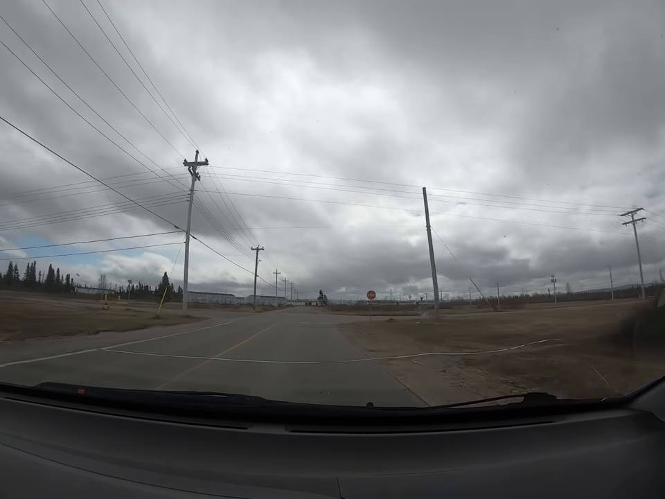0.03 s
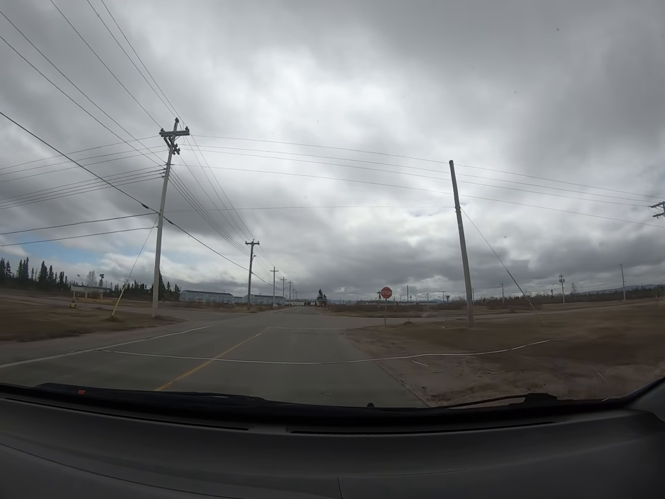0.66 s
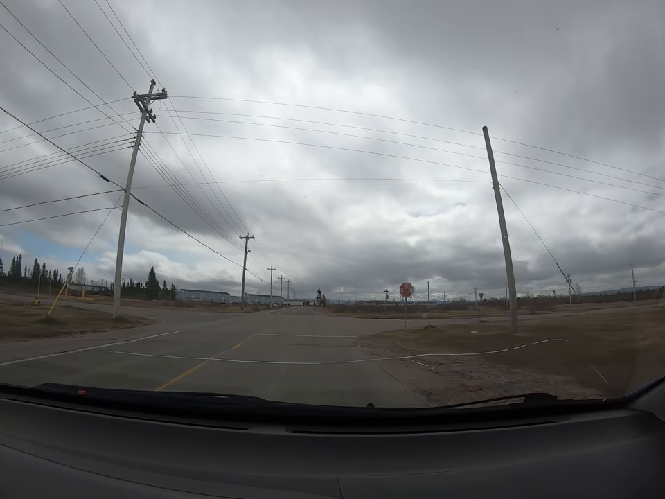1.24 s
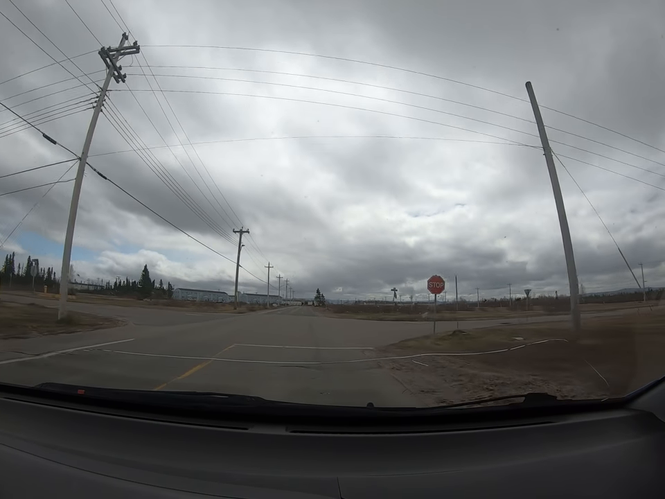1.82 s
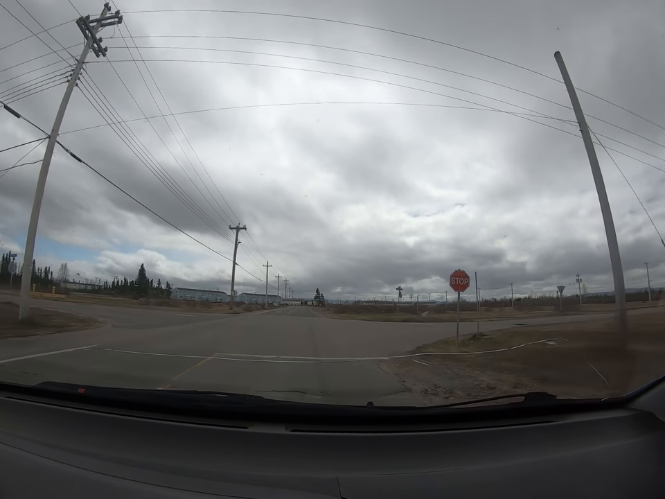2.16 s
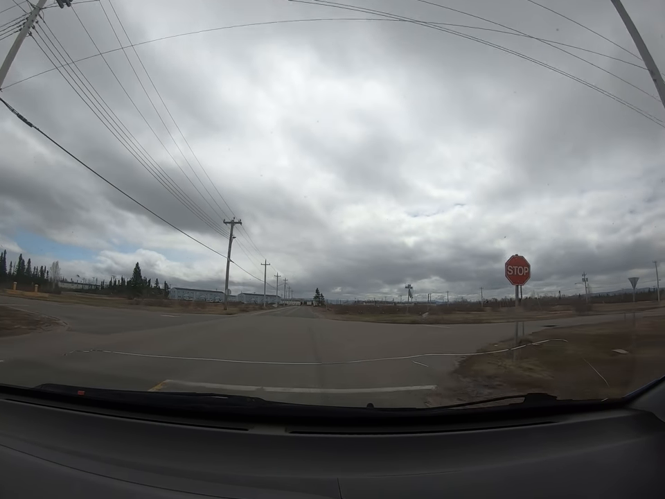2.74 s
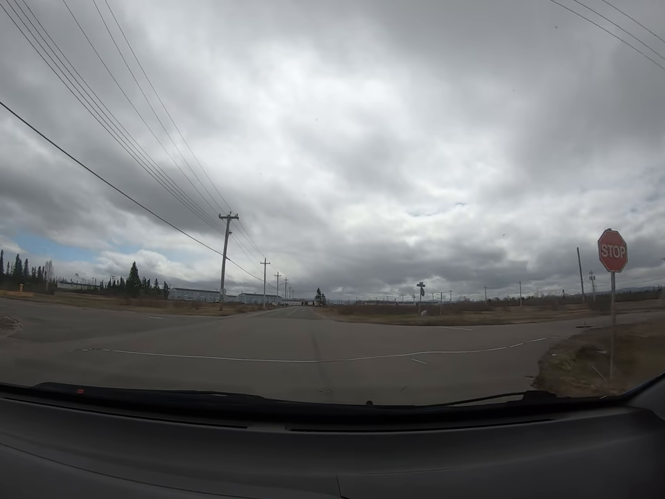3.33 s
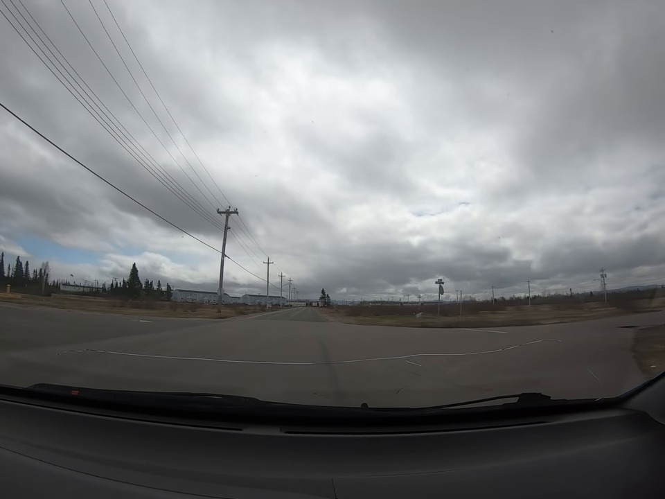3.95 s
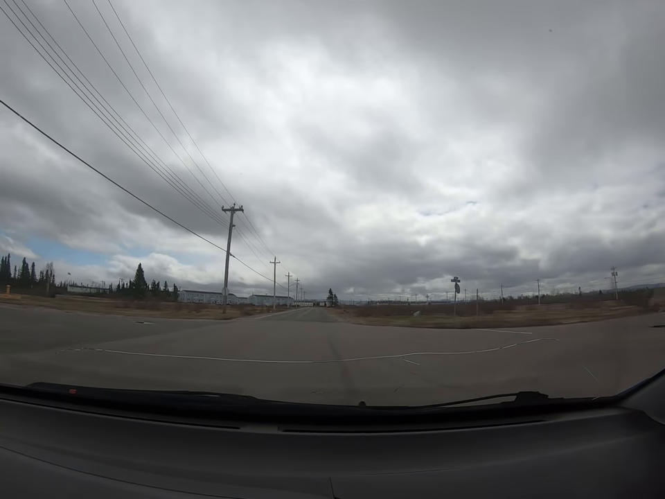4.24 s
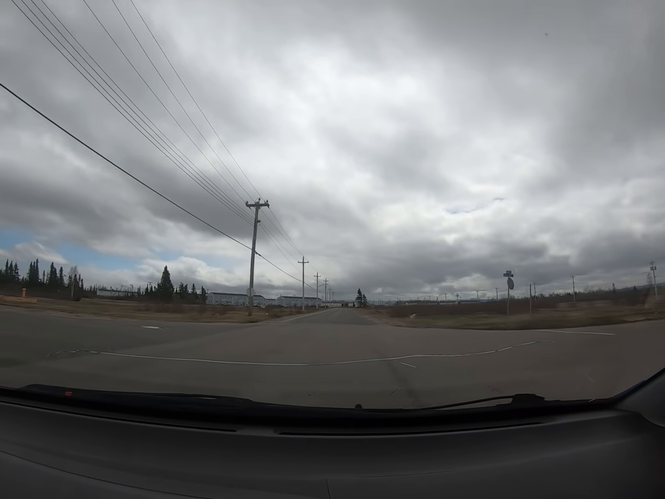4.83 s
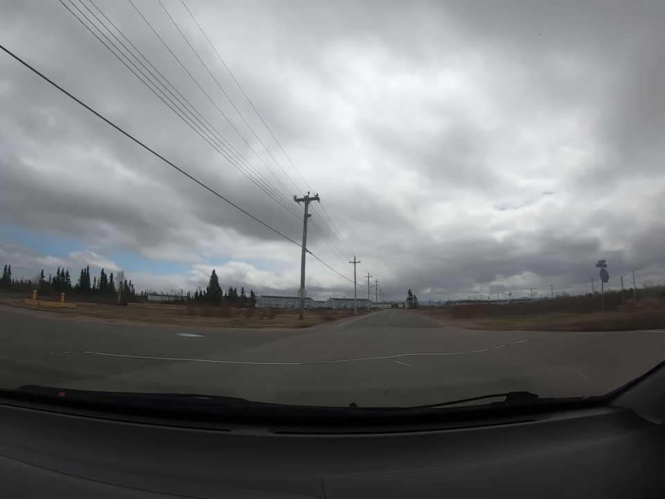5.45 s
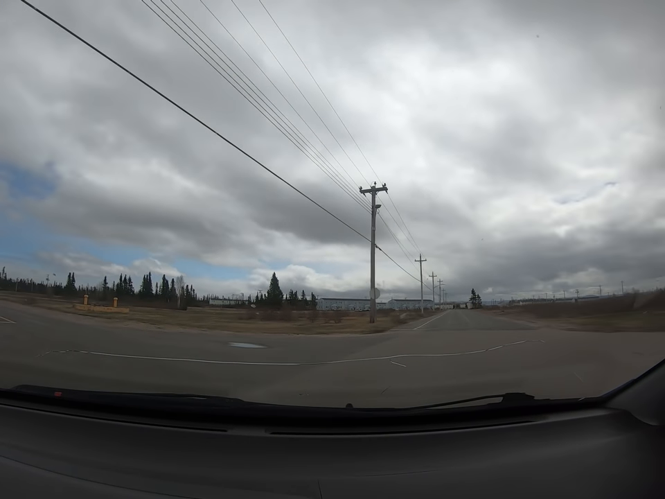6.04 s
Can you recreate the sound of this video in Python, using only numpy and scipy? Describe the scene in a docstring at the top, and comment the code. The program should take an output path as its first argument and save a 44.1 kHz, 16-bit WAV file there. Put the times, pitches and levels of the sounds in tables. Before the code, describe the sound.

A turn signal clicks evenly, close to a stereo microphone on the dashboard, over the deep rumble of a car's engine and tyres. The engine note sinks as the car nears a junction, and a cluster of dull jolts booms through the cabin. Loose sand hisses faintly below the floor, with scattered stone ticks and a couple of sharper cracks. Near the end the engine picks up speed with a light whirr.

```python
"""Car at a junction, from inside

Stereo microphone at the dashboard. The car slows, jolts over seams, crosses loose grit and pulls away.
The engine drones and whirrs under the road rumble, and the rolling tyres hum. Below the floor, grit
hisses in the wheel arches and stones strike the underside. Close by, the indicator relay goes tick-tock."""
import sys
import numpy as np
from scipy import signal
from scipy.fft import rfft, irfft, next_fast_len
from scipy.io import wavfile
from scipy.ndimage import map_coordinates

SR = 44100
rng = np.random.default_rng(int(sys.argv[2]) if len(sys.argv) > 2 else 0)


def file_out(sig):
    """Save sig as 16-bit WAV at sys.argv[1]."""
    # one column per channel
    cols = np.atleast_2d(sig).T
    # limit, then scale
    lim = np.clip(cols, -1, 1)
    pcm = np.round(lim * 32767).astype(np.int16)
    wavfile.write(sys.argv[1], SR, pcm)


N = 268128

# Cabin resonances. Each row: centre in Hz, width in Hz, lift in dB.
CABIN_RESONANCES = [(81.4, 31, 4), (189, 26, 3), (243, 10, 3), (358.5, 19, 3), (883, 73, 9), (982, 30, 6.5),
                    (1282, 62, 6.5), (1525, 32, 5), (2916, 70, 6.5), (3360, 70, 6), (3620, 130, 3.5),
                    (5330, 120, -1)]
# How alike the cabin noise is left and right. Each row: frequency in Hz, likeness from 0 to 1.
STEREO_LIKENESS = [(30, 0.93), (80, 0.96), (150, 0.87), (280, 1), (550, 0.85), (1000, 0.076), (2500, 0.49),
                   (8000, .05)]
# Noise colours at the microphone. Each row: frequency in Hz, relative spectral level in dB.
RUMBLE_SPECTRUM = [(14, -37.5), (22, -13.5), (30, 1.5), (47, 2.5), (61, -11), (88, -7.5), (130, -12.5),
                   (170, -24.5), (220, -39), (370, -120)]  # suspension
BODY_SPECTRUM = [(94, -23.5), (160, -3), (231, -10), (295, -13), (366, -15.5), (481, -21.5), (560, -28),
                 (730, -63), (1230, -120)]  # body panels
ROAR_SPECTRUM = [(290, -32), (500, -11.5), (538, -0.5), (629, -5), (773, -1.5), (926, -14), (996, -5.5),
                 (1080, -10), (1320, -11), (1800, -15.5), (3180, -25), (3420, -27), (4570, -44.5),
                 (5220, -37.5), (9000, -58), (11700, -82.5), (19800, -120)]  # tread on asphalt
WHIRR_SPECTRUM = [(900, -35), (1150, -6), (1300, 6.5), (1500, -4.5), (2400, -4.5), (3050, -7.5),
                  (3450, -7.5), (4200, -14.5), (5400, -12), (7000, -23.5), (10000, -30), (13000, -56)]  # belts and valve gear
GRIT_SPECTRUM = [(880, -36.5), (1500, -2.5), (1970, -1.5), (2540, -5.5), (3400, -7.5), (5000, -10),
                 (6450, -11), (9830, -15.5), (10800, -21.5), (14000, -51), (22000, -120)]  # gritty hiss
STONE_SPECTRUM = [(300, -38.5), (800, -25.5), (1150, -12), (1400, -8.5), (2000, -5.5), (2600, -6),
                  (3450, -8), (4400, -2.5), (5200, -5), (6250, -3), (7800, -7), (10300, -10.5),
                  (11200, -30.5), (15000, -35.5)]  # a stone's crack
TOCK_SPECTRUM = [(350, -26), (520, 0.5), (720, 0), (850, -2), (1400, 3), (1850, 9), (2500, -1.5),
                 (3400, -1), (4400, -3.5), (7700, -5), (10300, -7.5), (11300, -19), (14000, -24.5),
                 (16000, -36)]  # relay contacts closing
TICK_SPECTRUM = [(400, -33), (900, 7), (1900, -3), (2600, 4), (3300, 3.5), (4000, 1), (4550, -1),
                 (5400, 1.5), (6300, -8), (7500, -1.5), (10300, -1.5), (11300, -16.5), (14500, -19.5),
                 (16000, -32.5)]  # relay contacts opening
# Levels along the drive. Each row: time in seconds, level in dB.
SUSPENSION_LEVEL = [(0, -22), (.45, -29), (1.3, -25.5), (2.05, -22.5), (2.25, -26.5), (2.72, -23),
                    (2.8, -31), (2.88, -22), (3.15, -21), (3.3, -26), (3.5, -24), (3.85, -24), (4.2, -30.5),
                    (4.6, -28.5), (5.5, -23.5), (6.08, -26)]  # set by how uneven the road is
SURFACE_DRIVE = [(0.0, -45), (0.49, -46), (0.77, -45), (1.25, -46.5), (2.63, -49), (2.98, -47.5),
                 (3.18, -51), (3.49, -51), (3.82, -50), (4.97, -48.5), (5.09, -47), (5.69, -45.5),
                 (5.95, -45), (6.05, -45.5)]  # how hard the surface drives the tyres, taken relative to its mean
ENGINE_LEVEL = [(0, -21), (2.6, -20.5), (2.85, -32), (3.35, -29), (3.48, -17.5), (3.62, -23), (3.77, -15.5),
                (3.97, -26.5), (4.25, -31), (4.6, -25.5), (4.8, -17.5), (4.97, -23), (5.21, -24.5),
                (5.8, -23.5), (6.08, -30.5)]  # steady on the approach, uneven across the junction
SAND_FILM_LEVEL = [(2.6, -86.5), (3.05, -73.5), (3.45, -73.5), (3.9, -67), (4.55, -65.5), (5.3, -69.5),
                   (6.08, -85)]  # thin sand over the whole junction
SOFTENING = [(0, 0), (1.3, -1), (2.2, -1.5), (2.85, -0.5), (3.4, -4), (4.1, -1.5), (4.8, .5)]  # the clicks and the whirr soften for a moment
# Tyre hum. Each row: time in seconds, pitch in Hz, level in dB.
TYRE_HUM = [(0, 148.2, -31.5), (.35, 146.3, -34), (.7, 137.3, -33.5), (1.1, 140.5, -44),
            (1.5, 148.1, -35.5), (1.8, 145.8, -45), (2.1, 146.4, -33.5), (2.6, 139.9, -35.5),
            (2.82, 140, -43), (3.4, 139.8, -53.5), (3.7, 143, -36.5), (4.02, 146.2, -46),
            (4.15, 147.9, -35.5), (4.4, 148.1, -34.5), (4.6, 149.1, -35), (4.78, 147, -27.5),
            (5.04, 151.1, -41), (5.26, 151.7, -31.5), (5.42, 146.8, -40), (5.54, 146, -33.5),
            (5.85, 145.3, -46.5), (6.05, 149, -32.5)]
# Engine speed. Each row: time in seconds, firing rate in Hz.
FIRING_RATE = [(0, 35.78), (.7, 35.34), (1.3, 33.94), (2.02, 31), (3.5, 27.45), (4.45, 27.49), (4.85, 33.8),
               (5.21, 43.57), (5.72, 50.4), (6.08, 58.58)]
# Wheels over seams. Each row: start in seconds, level in dB, boom in Hz, length and attack in seconds.
SEAM_JOLTS = [(2.826, -21, 83.3, 0.13, .015), (2.859, -15.5, 42.6, 0.077, .012),
              (2.986, -21, 40, 0.053, .012), (3.041, -13.5, 89, 0.032, .008),
              (3.061, -11.5, 44.85, .2, .006), (3.099, -25, 91.3, 0.12, .015),
              (3.664, -21, 43.66, 0.16, .017), (4.365, -16.5, 47.3, .11, .017)]
# Patches of gritty hiss; the last is a brief, thin, high hiss.
# Each row: start and length in seconds, level in dB, brightness in dB per octave.
HISS_PATCHES = [(2.878, 0.29, -62, -2.5), (3.577, 0.16, -59.5, -1.5), (4.01, 0.42, -64, 0.5),
                (4.676, 0.13, -58, -2.5), (4.907, 0.16, -62.5, 5.5)]
# Stones on the underside. Each row: start in seconds, level in dB, left over right in dB,
# brightness in dB per octave, place from floor pan (0) to wheel arch (1).
STONE_HITS = [(0.171, -50, 3, -12.5, 0.37), (0.734, -55.5, -3, -4.5, 0.36), (2.327, -56.5, -1, -2, 0.49),
              (2.684, -59, -4, -3, 0.48), (3.039, -55, -1, -0.5, 0.48), (3.0487, -46, 0, -7, 0.61),
              (3.293, -44, -5, -11, 0.53), (3.674, -47, -5, -14, 0.47), (3.735, -50, -4, -10, .5),
              (3.9737, -25.5, -3.5, -0.5, 0), (4.023, -51, -3, -10, 0.56), (4.166, -46, -5, -9.5, .5),
              (4.347, -56, -1, 3.5, 0.69), (4.554, -47.5, -6, -11, .5), (4.695, -58.5, 0, -4.5, 0.54),
              (4.991, -58, -2, 4, 0.72), (5.133, -42.5, 4, -2.5, 0.75), (5.1403, -32, -4, -3.5, 0.93),
              (5.292, -46.5, -4, -8.5, 0.49), (5.995, -46.5, 5, -10.5, .5)]
# Ringing parts. Each row: frequency in Hz, level in dB, seconds to fall 60 dB, left over right in dB.
FLOOR_PAN_MODES = [(1520, -14, .05, -2), (2700, -15, .035, -2), (3074, -9.5, .04, -1), (3451, -5, .04, 1),
                   (3890, -12, .045, 0), (4220, -11, .03, -2), (4549, -12.5, .05, -2), (4899, -14, .036, 3),
                   (5800, -11, .025, 0), (6390, -9, .032, 1), (6830, -14, .03, 0), (7400, -13, .032, 5),
                   (8000, -13, .025, 3)]
WHEEL_ARCH_MODES = [(1280, -16, .05, 0), (1500, -11, .04, -2), (2256, -15, .04, 0), (3000, -13, .03, -2),
                    (4000, -9, .028, 0), (4950, -10, .035, 2), (5970, -5.5, .04, 0), (6680, -7, .035, 0),
                    (8100, -9, .04, 2), (9850, -10, .035, 3)]
TOCK_MODES = [(470, -28.5, .042, -2.5), (614, -33.5, .055, -4.5), (715, -37.5, .06, -9),
              (977, -42.5, .05, 1), (1162, -47.5, .06, -8), (1400, -48, .06, 1), (1570, -48.5, .05, -3),
              (1700, -41, .038, -5), (1837, -36.5, .05, -1), (2130, -47.5, .06, .5), (2345, -51, .07, -2),
              (3000, -48, .06, -4), (3075, -51, .06, -8), (3620, -51, .07, -2), (3810, -56, .06, -6),
              (5470, -54, .05, -1.5), (7180, -53, .055, -3.5), (7600, -55, .055, -1), (9300, -53, .05, 3)]  # relay closing
TICK_MODES = [(460, -36.5, .04, -3.5), (715, -46.5, .06, -5.5), (1830, -58, .07, -.5),
              (2314, -54.5, .08, -.5), (2740, -54, .07, -5), (3058, -41.5, .036, -6), (3300, -51, .035, -4),
              (3445, -54, .06, -1.5), (3680, -52, .04, -4), (3950, -53.5, .04, -8), (5259, -54.5, .044, -7),
              (7526, -55, .04, -4), (9324, -58, .04, 12)]  # relay opening
# Where the relay's snap sits in the stereo picture. Each row: frequency in Hz, left over right in dB.
SNAP_BALANCE = [(1000, -7.5), (5500, 0.5), (7500, -2.5), (9500, 3.5)]


def amp(db):
    """Decibels to gain."""
    return 10 ** (np.asarray(db) / 20)


def unit(x):
    """Scale to rms 1."""
    return x / np.sqrt(np.mean(x ** 2) + 1e-20)


def along(points, hz):
    """Read (Hz, value) points on a log frequency axis."""
    freqs, values = np.transpose(points)
    return np.interp(np.log(hz + 1), np.log(freqs + 1), values)


def curves(rows):
    """One value per sample for each column after the time."""
    times, *columns = np.transpose(rows)
    return [np.interp(np.arange(N) / SR, times, column) for column in columns]


def wobble(rate):
    """A smooth random curve, rate knots a second."""
    return map_coordinates(rng.standard_normal(int(N * rate / SR) + 4), [np.arange(N) * rate / SR])


def filtered(x, response):
    """Filter x by a gain given as a function of Hz."""
    n = x.shape[-1]
    padded = next_fast_len(n + 8192)
    return irfft(rfft(x, padded) * response(np.fft.rfftfreq(padded, 1 / SR)), padded)[..., :n]


def tilted(rows, db_per_octave):
    """Brighten or dull a spectrum or a set of modes about 3 kHz."""
    return [(hz, db + db_per_octave * np.log2(hz / 3000), *rest) for hz, db, *rest in rows]


def resonance(hz, centre, width):
    """A bell-shaped peak of height 1."""
    return 1 / (1 + (2 * (hz - centre) / width) ** 2)


def pan(db):
    """Left and right gains; positive dB leans left."""
    return amp([[db / 2], [-db / 2]])


def add(track, start, sound):
    """Mix a sound into the track at start seconds."""
    part = track[:, max(round(start * SR), 0):]
    part[:, :sound.shape[-1]] += sound[..., :part.shape[-1]]


def cabin_noise(spectrum):
    """Stereo noise of rms 1, coloured by the cabin's resonances, near mono in the bass."""
    def colour(hz):
        lift_db = sum(db * resonance(hz, centre, width) for centre, width, db in CABIN_RESONANCES)
        spread = np.arccos(np.clip(along(STEREO_LIKENESS, hz), 0, 1)) / 2
        return amp(along(spectrum, hz) + lift_db) * [np.cos(spread), np.sin(spread)]
    mid, side = filtered(rng.standard_normal((2, N)), colour)
    return unit(np.array([mid + side, mid - side]))


def burst(spectrum, t60, attack, tilt_db=0):
    """A click scattered by the cabin's close walls into a short dense tail."""
    t = np.arange(SR // 10) / SR
    octaves = lambda hz: np.log2(np.maximum(hz, 1200) / 3000)
    colour = lambda hz: amp(along(spectrum, hz) + tilt_db * octaves(hz))
    noise = unit(filtered(rng.standard_normal((2, len(t))), colour))
    return noise * amp(-60 * t / t60) * (1 - np.exp(-t / attack))


def ring(modes, attack):
    """Damped modes of alternating sign, each reaching left and right at its own strength and phase."""
    t = np.arange(SR // 10) / SR
    tones = 0
    for i, (hz, db, t60, side_db) in enumerate(modes):
        phase = np.pi * i + rng.normal(0, 0.14) * np.array([[1], [-1]])
        tones += pan(side_db) * amp(db - 60 * t / t60) * np.sin(2 * np.pi * hz * t + phase)
    return tones * (1 - np.exp(-t / attack))


def cabin_drone():
    """Far back in the mix, a faint, fuzzy note that holds its pitch whatever the road does."""
    note = filtered(rng.standard_normal(N), lambda hz: resonance(hz, centre=357, width=24))
    return amp(-58.5) * unit(note)


def whirr():
    """Belts and valve gear whirr through the bulkhead, louder as the engine speeds up."""
    hz, = curves(FIRING_RATE)
    speed_db = 7.5 * np.log2(hz / hz[0])
    return amp(-63.5 + speed_db) * cabin_noise(WHIRR_SPECTRUM)


def road():
    """Unevenness shakes the suspension; the surface's grain drives the panels and makes the tread roar."""
    shake_db, = curves(SUSPENSION_LEVEL)
    drive_db, = curves(SURFACE_DRIVE)
    drive_db -= drive_db.mean()
    flutter_db = .5 * wobble(12)
    rumble = amp(shake_db + 1.2 * wobble(9)) * cabin_noise(RUMBLE_SPECTRUM)
    body = amp(-40.5 + 1.2 * drive_db + flutter_db) * cabin_noise(BODY_SPECTRUM)
    roar = amp(-55 + 0.78 * drive_db + flutter_db) * cabin_noise(ROAR_SPECTRUM)
    return rumble + pan(-0.21) * body + pan(0.32) * roar


def tyre_hum():
    """A wavering tone from the rolling tyres, roughened by uneven tread, a little right of centre."""
    hz, db = curves(TYRE_HUM)
    phase = 2 * np.pi * np.cumsum(hz) / SR + .4 * wobble(11)
    waver_db = wobble(9)
    left_lead = 0.26 * np.array([[1], [-1]])
    tread = unit(np.abs(1 + .45 * (wobble(30) + 1j * wobble(30))))
    return np.sqrt(2) * pan(-2.5) * amp(db + waver_db) * tread * np.sin(phase + left_lead)


def engine():
    """The firing order booms in the cabin; its overtones grow as the engine speeds up."""
    hz, = curves(FIRING_RATE)
    db, = curves(ENGINE_LEVEL)
    phase = 2 * np.pi * np.cumsum(hz) / SR + 0.18 * wobble(14)
    load_db = 16 * np.log2(hz / hz[0])
    second = amp(-18.5 + load_db + 0.58 * wobble(29)) * np.sin(2 * phase)
    third = amp(-33.5 + load_db + 5.3 * wobble(2.7)) * np.sin(3 * phase + np.pi)
    return np.sqrt(2) * amp(db + 1.9 * wobble(8.9)) * (np.sin(phase) + second + third)


def jolts(damping_db_per_s=10.5):
    """Each seam sets the car's body booming for a few cycles and shakes the panels."""
    out, panels = np.zeros((2, N)), cabin_noise(BODY_SPECTRUM)
    for start, db, hz, length, attack in SEAM_JOLTS:
        t = np.arange(int(length * SR)) / SR
        swell = np.tanh(t / attack) * np.tanh(2 * np.pi * (1 - t / length)) * amp(-damping_db_per_s * t)
        shake = amp(-23.5) * panels[:, round(start * SR):][:, :len(t)] * np.exp(-t / 0.087)
        add(out, start, amp(db) * swell * (np.sin(2 * np.pi * hz * t) + shake))
    return out


def grit(attack_s=0.2, release_s=0.081, grains_per_s=130, grain_fade_s=.005):
    """A film of sand sprays the wheel arches in tiny impacts; patches of hiss build and fade over it."""
    t = np.arange(N) / SR
    film_db, = curves(SAND_FILM_LEVEL)
    hiss = amp(film_db) * cabin_noise(GRIT_SPECTRUM)
    for start, length, db, bright_db in HISS_PATCHES:
        rise = np.clip((t - start) / attack_s, 0, 1)
        fall = np.exp(-np.maximum(t - start - length, 0) / release_s)
        hiss += amp(db) * rise * fall * cabin_noise(tilted(GRIT_SPECTRUM, bright_db))
    impacts = rng.random(N) < grains_per_s / SR
    clump_db = 2 * wobble(18)
    scatter_db = 3.6 * np.minimum(rng.exponential(size=N), 2.5)
    grains = impacts * amp(clump_db + scatter_db)
    power = np.abs(signal.fftconvolve(grains ** 2, np.exp(-t[:SR // 20] / grain_fade_s))[:N])
    crackle = unit(np.sqrt(power + power.mean()))
    return pan(0.61) * amp(1.2 * wobble(12)) * crackle * hiss


def stones():
    """Single stones crack and ring the floor pan or a wheel arch, some dull, some bright."""
    out = np.zeros((2, N))
    for start, db, side_db, bright_db, place in STONE_HITS:
        crack = amp(2.5) * burst(STONE_SPECTRUM, t60=.022, attack=.0015, tilt_db=bright_db)
        tail = amp(-5.5) * burst(STONE_SPECTRUM, t60=.057, attack=.004, tilt_db=bright_db)
        floor = (1 - place) * ring(tilted(FLOOR_PAN_MODES, bright_db), attack=.0012)
        arch = place * ring(tilted(WHEEL_ARCH_MODES, bright_db), attack=.0012)
        add(out, start, amp(db) * pan(side_db) * (crack + tail + floor + arch))
    return out


def snap(spectrum):
    """The broadband snap of the relay contacts; its top treble favours the left."""
    sides = lambda hz: amp(along(SNAP_BALANCE, hz) * np.array([[.5], [-.5]]))
    return filtered(burst(spectrum, t60=.07, attack=.0022), sides)


def indicator(blink_s=.64125, first_tock_s=.2602, first_tick_s=.5932):
    """Close up in the dashboard, a relay closes and opens on a steady timer, nearly alike every time."""
    tock, tick = amp(-40.5) * snap(TOCK_SPECTRUM), amp(-44.5) * snap(TICK_SPECTRUM)
    tock_ring, tick_ring = ring(TOCK_MODES, attack=.0027), ring(TICK_MODES, attack=.0014)
    out = np.zeros((2, N))
    for start in np.arange(0, N / SR, blink_s):
        closing, opening = amp(rng.normal(0, 1.1, 2))  # the contacts bounce differently each time
        tock_chatter, tick_chatter = amp(-45.5) * snap(TOCK_SPECTRUM), amp(-47.5) * snap(TICK_SPECTRUM)
        add(out, start + first_tock_s, tock + closing * tock_ring + tock_chatter)
        add(out, start + first_tick_s, tick + opening * tick_ring + tick_chatter)
    return out


def scene():
    """Everything as heard from the dashboard."""
    soften_db, = curves(SOFTENING)
    driving = engine() + tyre_hum() + cabin_drone() + road()
    underside = jolts() + grit() + stones()
    return driving + underside + amp(soften_db) * (indicator() + whirr())


def record(dry, top_hz=15700):
    """The recorder keeps nothing above its band limit."""
    return filtered(dry, lambda hz: hz < top_hz)


dry = scene()
out = record(dry)
file_out(out)
```